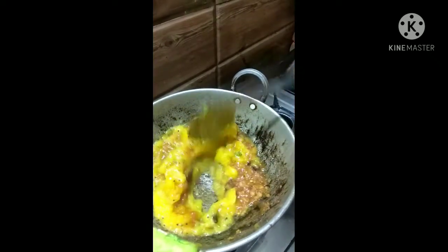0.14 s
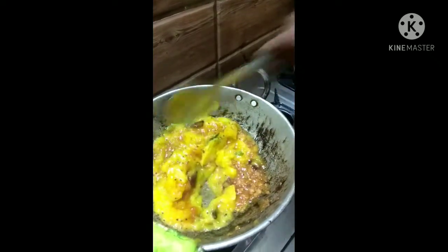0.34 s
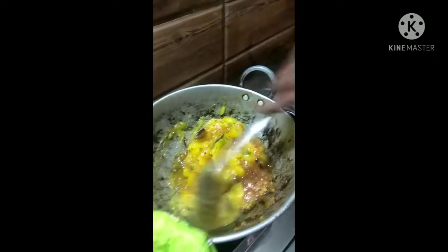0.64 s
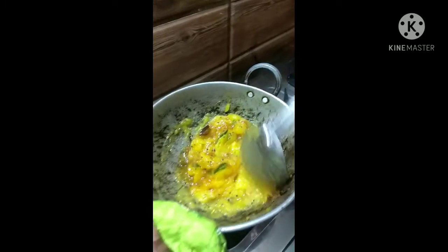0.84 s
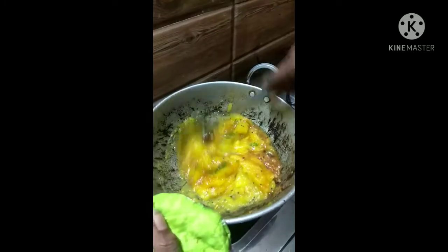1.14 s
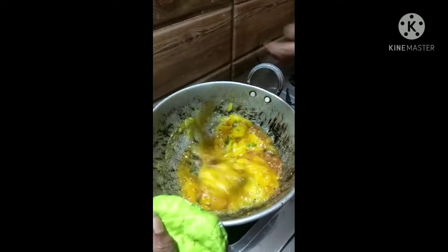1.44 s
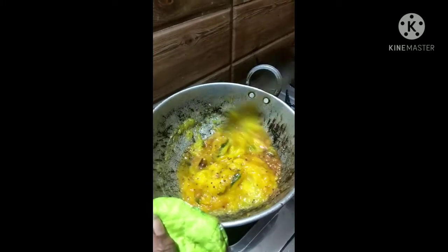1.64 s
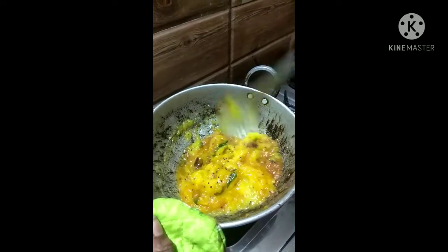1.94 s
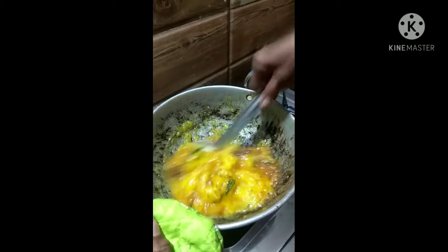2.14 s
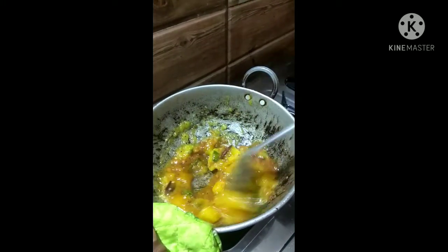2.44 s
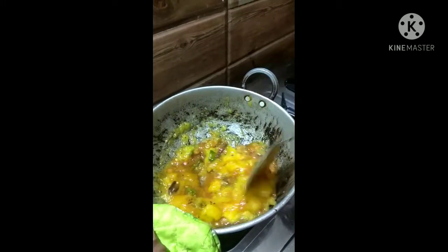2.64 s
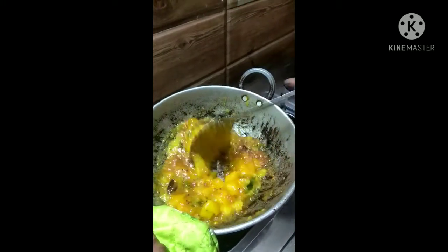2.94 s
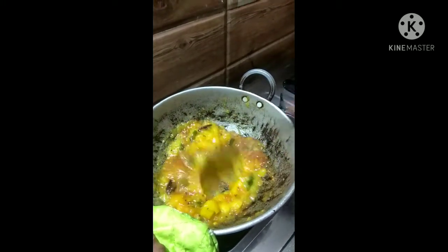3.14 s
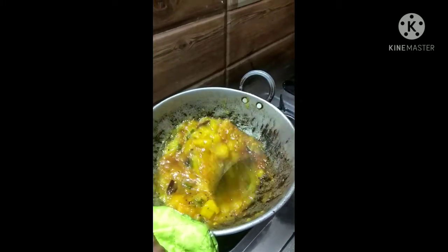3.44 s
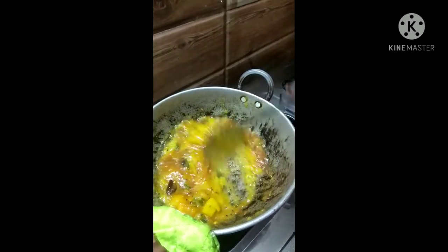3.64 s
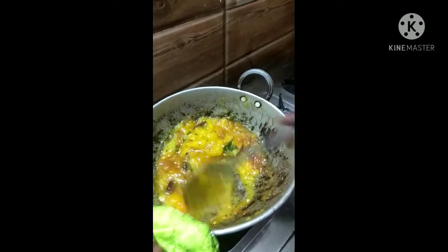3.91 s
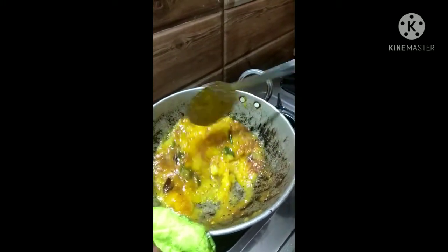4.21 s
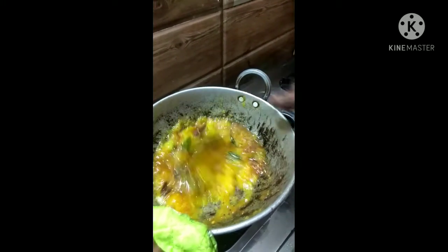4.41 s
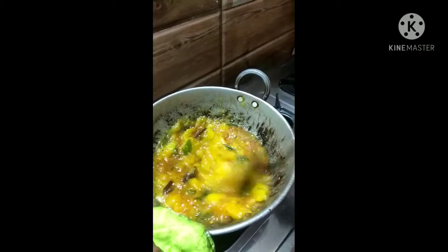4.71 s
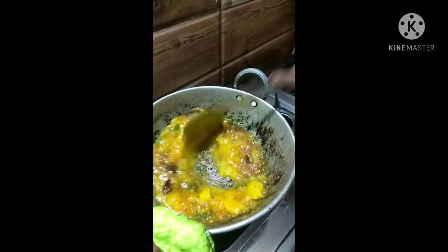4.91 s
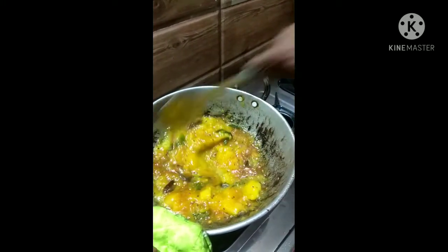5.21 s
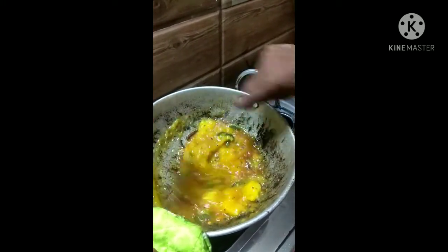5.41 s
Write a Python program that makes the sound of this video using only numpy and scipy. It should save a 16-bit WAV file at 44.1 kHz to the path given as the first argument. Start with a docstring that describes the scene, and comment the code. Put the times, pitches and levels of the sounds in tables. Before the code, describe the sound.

Thick food is stirred in a metal pan, with rasping scrapes, ringing knocks and a faint simmer over a gas flame.

```python
"""A slotted metal spatula scrapes and knocks against a deep metal pan of thick food on a gas stove.
Grit under the edge hisses and rasps, knocks make the pan ring dully, and both have a thin, high sheen.
Fat spits, lumps plop back, and the food simmers over the low drone of the flame. A small tiled kitchen
echoes the short sounds. Two microphone ports (openings) pick it all up, one bright and one dull."""
import sys
import numpy as np
from scipy import signal
from scipy.fft import rfft, irfft
from scipy.io import wavfile
from scipy.ndimage import uniform_filter1d

SR = 44100
rng = np.random.default_rng(int(sys.argv[2]) if len(sys.argv) > 2 else 0)


def write(x):
    x = np.atleast_2d(x).T
    wavfile.write(sys.argv[1], SR, np.round(np.clip(x, -1, 1) * 32767).astype(np.int16))


N = 245195
HZ = np.fft.rfftfreq(N, 1 / SR)
# tone of the spatula's edge on the pan: (frequency [Hz], level [dB])
EDGE_TONE = [(880, -34), (1500, -11.5), (1820, -5.5), (1970, -11.5), (2580, -8), (3150, -10.5),
             (3780, -10.5), (4390, -7), (5530, -7.5), (8770, -4.5), (10000, 3), (11200, 5.5), (12600, 0.5),
             (14000, -3.5), (15600, -5), (16500, -63)]


def scrapes():
    """The dragged edge hisses and rasps over grit and shakes the wall and the bottom of the pan."""
    gains, furrow_hz = drag_curves()
    edge = colour(patchy(grit(per_s=8000, spread_db=-5), 5.16, frames=36, bins=3), EDGE_TONE)
    slips = colour(grit(per_s=460, spread_db=3), EDGE_TONE)  # the edge sticks and lets go
    low_edge = signal.sosfiltfilt(signal.butter(3, 7000, fs=SR, output="sos"), edge)
    hiss = unit_level(edge - low_edge) + 0.28 * unit_level(slips)
    rasp = unit_level(low_edge) + 0.44 * unit_level(pan(edge, lo_hz=2000, hi_hz=7000))
    rasp += 0.45 * unit_level(high_ring(slips)) + 0.37 * unit_level(slips)
    # tone of the shaking wall: (frequency [Hz], level [dB])
    wall_tone = [(240, -106), (400, 8), (566, 1.5), (667, 6.5), (816, 2.5), (1190, 5), (2770, -3),
                 (4000, -2), (5200, -11), (8800, -120)]
    shake = colour(patchy(grit(per_s=1700, spread_db=0), 2.5, frames=40, bins=2), wall_tone)
    furrow = glide(glide(shake, furrow_hz, 180), furrow_hz, 320)  # the hollow behind the spatula
    wall = unit_level(shake) + 0.52 * unit_level(pan(shake, lo_hz=500, hi_hz=3000))
    wall += amp(-6) * unit_level(furrow)
    push = grit(per_s=600, spread_db=-15)
    bottom = unit_level(pan(push, lo_hz=100, hi_hz=500)) + 0.45 * unit_level(ring_twice(push, 290, 300))
    return sum(gain * unit_level(layer) for gain, layer in zip(gains, (hiss, rasp, wall, bottom)))


def drag_curves():
    """How strong hiss, rasp, wall and bottom are over time; the loudest drag leads the furrow's pitch."""
    # drags of the edge along the pan:
    # (start [s], rise [s], hold [s], hiss [dB], rasp [dB], wall [dB], bottom [dB], furrow pitch [Hz])
    drags = [(0, .001, 0.0047, -43, -48, -57, -63, 870),
             (0.013, 0.0047, 0.0089, -34, -39.5, -33.5, -35.5, 850),
             (0.055, 0.012, 0.059, -45, -47, -45.5, -42.5, 910),
             (0.104, 0.071, .005, -48.5, -50, -52, -63, 860),
             (0.182, 0.025, 0.16, -56, -55.5, -53.5, -48, 900),
             (0.395, 0.01, 0.027, -27.5, -32.5, -44, -48, 1420),
             (0.442, 0.031, 0.029, -46, -40, -36, -36, 830),
             (0.491, 0.084, 0.073, -26, -27.5, -30.5, -37.5, 1460),
             (0.665, 0.023, 0.069, -23.5, -28, -32, -33.5, 1150),
             (0.74, 0.033, .005, -21, -47, -34.5, -34.5, 1180),
             (1.154, 0.002, 0.071, -22.5, -27, -33, -33.5, 1230),
             (1.183, 0.087, 0.011, -37, -40, -25, -30.5, 524),
             (1.39, 0.044, 0.0099, -45, -45.5, -56, -40.5, 694),
             (1.478, 0.036, .04, -59, -52, -56, -46, 700),
             (1.555, 0.0089, 0.0053, -30, -33.5, -56, -43, 1130),
             (1.584, 0.0013, 0.0037, -13, -47, -20, -18.5, 1200),
             (1.625, 0.021, 0.0082, -11, -15.5, -26.5, -28.5, 1180),
             (1.687, 0.0056, 0.04, -21.5, -50, -34.5, -33, 1170),
             (1.972, 0.0025, 0.002, -13.5, -18.5, -26.5, -26, 1110),
             (1.998, 0.02, 0.0094, -29, -24.5, -32, -29, 1180),
             (2.024, 0.01, 0.017, -16, -21.5, -44, -48, 1200),
             (2.134, 0.033, 0.11, -38, -39, -38, -44, 1310), (2.2, 0.017, 0.017, -66, -39, -37, -79, 1670),
             (2.308, 0.048, 0.08, -62, -48.5, -56, -51.5, 665),
             (2.451, 0.089, 0.085, -38.5, -40.5, -52.5, -56.5, 620),
             (2.706, 0.052, 0.072, -49.5, -48.5, -60, -78, 1320),
             (2.835, 0.003, 0.099, -35, -32.5, -33.5, -30.5, 890),
             (2.968, 0.03, 0.16, -48.5, -54.5, -43, -69, 1500),
             (3.156, 0.041, 0.021, -45, -56, -47.5, -73, 1090),
             (3.231, 0.00097, 0.023, -35.5, -38.5, -28.5, -24, 880),
             (3.252, 0.013, 0.11, -40, -48, -62, -43.5, 740), (3.407, .02, 0.064, -57, -52, -71, -56, 1010),
             (3.591, 0.00084, 0.028, -25.5, -25.5, -19, -24.5, 1340),
             (3.674, 0.02, 0.049, -44.5, -58, -60, -39.5, 712),
             (3.788, 0.014, 0.077, -71, -59, -54.5, -53, 900),
             (3.982, 0.0018, 0.004, -44, -33, -36.5, -39, 1190),
             (3.989, 0.0011, 0.0057, -36, -38, -27, -27, 1150),
             (4.069, 0.0054, 0.0033, -35.5, -40, -44, -40, 746),
             (4.107, 0.057, 0.041, -41.5, -49.5, -45, -48.5, 910),
             (4.2, 0.028, 0.13, -82, -56.5, -42.5, -50, 915),
             (4.409, 0.0015, .01, -37.5, -45.5, -43.5, -67, 930),
             (4.424, 0.012, 0.14, -52, -50.5, -45, -43.5, 880),
             (4.565, 0.022, 0.032, -52, -47.5, -52, -46.5, 805),
             (4.669, 0.003, 0.0054, -30.5, -36.5, -53, -53, 1600),
             (4.721, 0.014, 0.059, -51, -47.5, -50.5, -36.5, 676),
             (4.823, 0.0015, 0.027, -40.5, -41, -59, -58, 740),
             (4.85, 0.013, 0.048, -46, -44, -53.5, -52.5, 1190),
             (4.949, 0.0029, 0.044, -44, -48, -67, -49.5, 860),
             (5.051, 0.0027, 0.067, -70, -55, -55, -42, 815),
             (5.27, 0.0018, 0.034, -40, -39.5, -45, -37, 1010),
             (5.289, 0.023, 0.028, -32.5, -30, -45, -57, 1060),
             (5.33, 0.027, 0.068, -35.5, -35.5, -35, -36.5, 1570),
             (5.402, 0.052, 0.05, -30.5, -28, -35.5, -29, 1270),
             (5.505, 0.014, 0.057, -37, -38, -29, -40, 1120)]
    columns = np.transpose(drags)
    timing, levels_db, pitch_hz = columns[:3], columns[3:7], columns[7]
    # how the four layers die away: (quick drop [dB/s], lingering part [dB], its fade [dB/s])
    fades = [(410, -8, 163), (226, -12.5, 87), (370, -9, 97), (171, -12.5, 140)]
    powers = [drag_power(timing, db, *fade) for db, fade in zip(levels_db, fades)]
    wall_power = powers[2]
    furrow_hz = (pitch_hz @ wall_power + pitch_hz[0] * 1e-20) / (wall_power.sum(axis=0) + 1e-20)
    gains = [ms_to_samples(np.sqrt(power.sum(axis=0))) for power in powers]
    return gains, ms_to_samples(furrow_hz)


def drag_power(timing, top_db, drop, linger_db, slow_fade, rise_from_db=-11.5):
    """Each drag's power, once a millisecond: it swells, holds, then drops and lingers as the edge lifts."""
    start, rise, hold = timing[:, :, None]
    since_start = np.arange(N * 1000 // SR + 2) / 1000 - start
    since_lift = np.maximum(since_start - rise - hold, 0)
    rising = amp(2 * rise_from_db * np.clip(1 - since_start / rise, 0, 1)) * (since_start >= 0)
    falling = amp(-2 * drop * since_lift) + amp(2 * (linger_db - slow_fade * since_lift))
    return amp(2 * top_db[:, None]) * rising * falling


def knocks():
    """The spatula hits the pan: a bright crack, a blow and clack with a rattle, and the pan ringing."""
    # spatula hits, with levels before the boosts below:
    # (time [s], blow [dB], clack [dB], crack [dB], blow pitch [Hz], rim [dB], clack pitch [Hz])
    hits = [(0.016, -26, -22.5, -41, 735, -27, 2210), (0.4, -38, -53, -16.5, 1000, -27, 1900),
            (0.413, -31.5, -45, -16, 1000, -14, 2580), (0.687, -45, -48, -13.5, 1230, -44, 1900),
            (0.725, -22, -45, -26, 1080, -35, 1900), (0.77, -27, -47, -21, 1110, -44, 1900),
            (1.156, -18.5, -17, -5, 1310, -35, 2250), (1.172, -45, -24, -16, 1200, -40, 2190),
            (1.244, -18.5, -39, -12, 506, -8.5, 1900), (1.568, -26.5, -19, -11, 1190, -45, 2640),
            (1.584, -14.5, -10.5, -3, 1250, -41, 5500), (1.643, -20.5, -18, -7, 790, 4, 3650),
            (1.65, -30, -8.5, -19, 1200, -0.5, 3700), (1.668, -19.5, -26, -5, 1150, -6, 3730),
            (1.975, -13.5, -29, -0.5, 1030, -8, 4540), (2.04, -30, -26, -7, 1300, -35, 5200),
            (2.745, -44, -37, -50, 1550, -55, 2290), (2.832, -16.5, -51, -47, 1240, -44, 1900),
            (2.84, -2.5, -6, -56, 910, -27, 2280), (3.227, -10, -13.5, -18, 1070, -20, 2780),
            (3.593, 0.5, -3, -9, 1130, -37, 1410), (3.985, -28, -26, -15, 1180, -37, 2180),
            (3.992, -11, -14, -38, 1090, -47, 2000), (4.673, -46, -41, -16.5, 1400, -47, 3470),
            (4.681, -28.5, -28, -12.5, 1400, -31, 2000), (5.271, -25.5, -25.5, -34, 1030, -41, 3220),
            (5.36, -39, -21, -21, 1070, -50, 2120)]
    thud_boost_db, clank_boost_db = 30.5, 16.5
    blows, cracks, rims, thuds, clanks = np.zeros((5, 2, N))
    t = np.arange(6000) / SR
    for start, blow_db, clack_db, crack_db, blow_hz, rim_db, clack_hz in hits:
        noise = rng.standard_normal((8, len(t)))
        first_wave = 4 * (t == 0) + 0.6 * noise[0] * decay(t, 0.004)  # reaches both ports alike
        rattle = 0.21 * noise[2:4] * decay(t, 0.11) * np.minimum(t / 0.00081, 1)
        force = first_wave + rattle
        blow = ring(ring(force, blow_hz, 0.5 * blow_hz), blow_hz, 0.77 * blow_hz)
        clack = ring(ring(force, clack_hz, 560), clack_hz, 600)
        add(blows, start + 0.000865, with_peak(blow, blow_db) + with_peak(clack, clack_db))
        add(thuds, start, amp(blow_db + thud_boost_db) * np.ones((2, 1)))
        tap = ring(np.ones((2, 1)) * (t == 0), blow_hz, blow_hz)
        add(clanks, start + 0.001036, amp(blow_db + clank_boost_db) * tap / tap.max())
        add(cracks, start, amp(crack_db) * noise[4:6] * (decay(t, 0.011) + 0.081 * decay(t, 0.13)))
        add(rims, start, amp(rim_db) * noise[6:] * decay(t, 0.053))
    bare_rim = pan(rims, lo_hz=3000, hi_hz=7000)  # above the food the metal rings freely
    boom = pan(thuds, lo_hz=100, hi_hz=500)
    clank = pan(clanks + amp(-42) * blows, lo_hz=100, hi_hz=3000)
    crack = colour(cracks, EDGE_TONE)
    return blows + boom + clank + crack + amp(10) * high_ring(crack) + amp(22.5) * bare_rim


def pan(x, lo_hz, hi_hz):
    """Shaken by x, the pan rings at those of its own notes that lie between two limits."""
    # the pan's notes: (pitch [Hz], level [dB], time to fade by 60 dB [s])
    notes = [(215, -12, .15), (299, -1, .2), (313, -7, .17), (453, -10, .2), (630, -12, .15),
             (726, -3, .15), (871, -9, .15), (1003, -12, .12), (1165, -11, .12), (1233, -4, .15),
             (1408, -9, .12), (1470, -10, .12), (1629, -9, .12), (1900, -14, .1), (2073, -18, .08),
             (2450, -16, .1), (3530, -11, .04), (3705, -9, .05), (3860, -12, .05), (4750, -15, .04),
             (5725, -12, .04)]
    return sum(amp(db) * fade_s * 10 * ring(x, hz, 1.44 / fade_s)
               for hz, db, fade_s in notes if lo_hz <= hz < hi_hz)


def high_ring(x):
    """Narrow high resonances that give the scrapes and cracks a thin, ringing sheen."""
    # the high resonances: (pitch [Hz], level [dB], ring length [s])
    resonances = [(2780, -13, 0.052), (3420, 3, 0.024), (4190, 5.5, 0.048), (4470, 0, 0.043),
                  (5370, 5.5, 0.014), (5880, 7, 0.048), (6250, 4, 0.025), (6630, -0.5, 0.018),
                  (7200, 0, 0.086), (7680, -26, 0.15), (8320, -29, 0.15), (9090, -19, 0.064)]
    return sum(amp(db) * ring(x, hz, 1.02 / ring_s) for hz, db, ring_s in resonances)


def ticks():
    """Spitting fat and light touches of the edge: tiny bursts that reach lower the duller they are."""
    # spits and touches: (time [s], peak level [dB], dullness [0-1])
    bursts = [(0.162, -23, 0), (0.214, -22, 0.01), (0.386, -24, 0), (0.43, -9, 0.15), (0.797, -9, 0.07),
              (0.906, -21, 0.03), (1.545, -27, 1), (1.849, -27, 0), (2.018, -8, 0), (2.4897, -17.5, 0),
              (3.059, -18, 0), (3.1582, -40, 0.6), (3.173, -38, 0.3), (3.3566, -24, 0), (3.658, -4.5, 0),
              (3.825, -25.5, 0.4), (4.075, -23, 0.6), (4.156, -42, 0.1), (4.177, -25, 0), (4.282, -34, 0.6),
              (4.4113, -23, 0.3), (4.4613, -17.5, 0.58), (4.482, -20, 0.04), (4.586, -24, 0.5),
              (4.83, -17, 0), (4.876, -27, 0), (4.902, -24, 0), (5.059, -30.5, 1), (5.1116, -33.5, 0.2)]
    out, t = np.zeros((2, N)), np.arange(1500) / SR
    for start, db, dullness in bursts:
        burst = rng.standard_normal((2, len(t))) * (decay(t, 0.0049) + 0.48 * decay(t, 0.053))
        lowest_hz = 9000 * amp(-25 * dullness)
        burst = signal.lfilter(*signal.butter(2, lowest_hz, "high", fs=SR), burst)
        add(out, start, amp(db) * burst / abs(burst).max(axis=1)[:, None])
    return out


def plops():
    """A soft lump lands: a quick hollow thud that wobbles as the food settles."""
    # falling lumps: (time [s], peak level [dB], pitch [Hz], settling time [s])
    lumps = [(1.433, -25, 734, 0.15), (2.808, -35, 1190, 0.079), (3.701, -23.5, 740, 0.19),
             (4.278, -33, 690, 0.12), (4.532, -24.5, 730, 0.12), (4.739, -25, 685, 0.13),
             (5.058, -42, 815, 0.13)]
    out, t = np.zeros((2, N)), np.arange(6000) / SR
    rise_s = 0.002
    for start, db, hz, settle_s in lumps:
        noise = rng.standard_normal((3, len(t)))
        slap = 8.4 * (abs(t - rise_s) < 0.5 / SR) + noise[0] * decay(t, 0.021)
        wobble = 0.55 * noise[1:] * amp(-60 * (t / settle_s) ** 1.45)
        force = (slap + wobble) * np.minimum(t / rise_s, 1)
        thud = ring(ring(ring(force, hz, 280), 0.91 * hz, 260), 1.03 * hz, 260)
        add(out, start - rise_s, with_peak(thud, db))
    return out + amp(-28) * pan(out, lo_hz=100, hi_hz=1500)


def clinks():
    """Tiny clinks: two high, slightly rough tones that start at once and die fast."""
    # clinks: (time [s], peak level [dB])
    events = [(1.9001, -34), (4.647, -26), (4.739, -45), (4.967, -24)]
    # the two tones: (pitch [Hz], level [dB])
    tones = [(10600, 0), (11900, 6)]
    out, t = np.zeros((2, N)), np.arange(3000) / SR
    for start, db in events:
        jolt = rng.standard_normal((2, len(t))) * decay(t, 0.05)
        clink = sum(amp(tone_db) * ring_twice(jolt, hz, 600) for hz, tone_db in tones)
        add(out, start, with_peak(clink, db))
    return out


def hum():
    """A faint, fuzzy hollow tone swells and fades in the pan as the food is folded over."""
    # the swell: (start [s], top [s], end [s], pitch [Hz], width [Hz], level [dB])
    swell = (2, 2.5, 3.5, 650, 107, -54)
    start, top, end, hz, width, db = swell
    tone = unit_level(ring_twice(rng.standard_normal((2, N)), hz, width))
    return amp(db) * tone * np.sqrt(np.interp(np.arange(N) / SR, [start, top, end], [0, 1, 0]))


def stove():
    """Steady simmer, the low drone of the flame and the faint rumble of the house."""
    # tone of flame and simmer: (frequency [Hz], level [dB])
    simmer_tone = [(15, -53), (25, -33), (97, -37), (138, -4), (197, -3.5), (378, -8), (470, -13.5),
                   (1680, -15), (1830, -13.5), (2460, -19), (4360, -24.5), (7110, -42), (11600, -17),
                   (15200, -30), (16500, -56)]
    flame_hz = 141
    simmer = colour(patchy(grit(per_s=5600, spread_db=2.5), 3.6, frames=60, bins=2), simmer_tone)
    drone = ring(ring(rng.standard_normal((2, N)), flame_hz, 8), flame_hz, 16)
    rumble = ring_twice(rng.standard_normal((2, N)), hz=60, width=62)
    return amp(-50) * unit_level(simmer) + amp(-56.5) * unit_level(drone) + amp(-83) * unit_level(rumble)


def kitchen(x):
    """The tiled room returns many small echoes; each pitch range dies at its own speed."""
    # length of the echo: (frequency [Hz], time to fade by 60 dB [s])
    fade_times = [(120, 0.77), (330, 0.55), (870, 0.48), (2300, 0.44), (6000, 0.44), (14000, 0.74)]
    echoes = np.zeros((2, SR // 2))
    grid = np.arange(200, SR // 2 - 20, 20)
    arrivals = grid + rng.integers(0, 20, (2, len(grid)))
    np.put_along_axis(echoes, arrivals, rng.choice([-1., 1.], arrivals.shape), 1)
    hz, t, bands = signal.stft(echoes, SR, nperseg=256)
    tail = signal.istft(bands * decay(t, look_up(fade_times, hz)[:, None]), SR, nperseg=256)[1]
    return signal.fftconvolve(x, tail / np.linalg.norm(tail[0]), axes=1)[:, :N]


def grit(per_s, spread_db):
    """Dense clicks of uneven size; each port hears its own mixture."""
    size = amp(spread_db * np.minimum(rng.exponential(1, N), 5)) * (rng.random(N) < per_s / SR)
    return np.sqrt(abs(uniform_filter1d(size, size=24))) * rng.standard_normal((2, N))


def patchy(x, patch_db, frames, bins):
    """Make x louder and softer in random patches, `frames` long in time and `bins` wide in pitch."""
    bands = signal.stft(x, nperseg=256, noverlap=192)[2]
    patches = uniform_filter1d(rng.standard_normal(bands.shape[1:]), size=bins, axis=0)
    patches = unit_level(uniform_filter1d(patches, size=frames, axis=1))
    return signal.istft(bands * amp(patch_db * patches), nperseg=256, noverlap=192)[1][:, :N]


def ring(x, hz, width):
    """A resonance: keeps the part of x near hz, in a band `width` Hz wide."""
    return signal.lfilter(*signal.iirpeak(hz, hz / width, SR), x)


def ring_twice(x, hz, width):
    return ring(ring(x, hz, width), hz, width)


def glide(x, hz, width):
    """A resonance that follows the curve hz: shift down to zero, smooth, shift back."""
    turn = np.exp(2j * np.pi * np.cumsum(hz) / SR)
    memory = np.exp(-np.pi * width / SR)
    return 2 * (turn * signal.lfilter([1 - memory], [1, -memory], x / turn)).real


def colour(x, tone):
    """Turn each frequency of x up or down as the tone table says."""
    return irfft(rfft(x) * amp(look_up(tone, HZ)), N)


def look_up(table, hz):
    """The value at hz, sliding between the rows of a table."""
    row_hz, values = np.transpose(table)
    return np.interp(np.log(hz + 1), np.log(row_hz + 1), values)


def amp(db):
    return 10 ** (np.asarray(db) / 20)


def decay(t, fade_s):
    """Falls by 60 dB every fade_s seconds."""
    return amp(-60 * t / fade_s)


def unit_level(x):
    return x / np.sqrt(np.mean(x ** 2) + 1e-20)


def with_peak(x, db):
    return amp(db) * x / abs(x).max()


def ms_to_samples(curve):
    return np.interp(np.arange(N) * 1000 / SR, np.arange(len(curve)), curve)


def add(mix, start_s, sound):
    part = mix[:, round(start_s * SR):][:, :sound.shape[1]]
    part += sound[:, :part.shape[1]]


def scene():
    """Stirring over the stove's steady sound; only the short sounds get the room's echo."""
    hits = knocks() + ticks() + clinks() + plops()
    stirring = hits + amp(-9) * kitchen(hits) + scrapes() + hum()
    bass_cut = signal.butter(2, 125, "high", fs=SR, output="sos")  # a small pan gives no deep bass
    left, other = rfft(signal.sosfilt(bass_cut, stirring) + stove())
    # long waves reach both ports alike: (frequency [Hz], left-right likeness [0-1])
    likeness = [(60, 0.43), (150, 1), (380, 0.78), (950, 0.12), (2380, 0), (5980, -0.0), (15000, 0.0066)]
    same = look_up(likeness, HZ)
    right = same * left + np.sqrt(1 - same ** 2) * other
    return irfft(np.array([left, right]), N)


def record(dry):
    """The left port favours the treble; both share an uneven bass and lose the very top."""
    # balance of the ports: (frequency [Hz], left above right [dB])
    balance = [(60, -1), (99, -8), (160, 5), (270, -3), (450, 0.5), (740, -2), (1220, 3.5), (2010, 4.5),
               (3330, 2.5), (5500, -2), (9080, 5), (15000, 30)]
    # tone of the microphone: (frequency [Hz], level [dB])
    mic_tone = [(25, 1), (45, 9.5), (75, -5), (100, 1.5), (125, -5), (15200, -4.5), (15600, -7),
                (15900, -27), (17000, -53)]
    lean = amp(look_up(balance, HZ))
    ports = np.array([lean, np.ones(len(HZ))]) * np.sqrt(2 / (1 + lean ** 2))
    heard = irfft(rfft(dry) * ports * amp(look_up(mic_tone, HZ)), N) * amp(0.5)
    heard = 0.95 * np.tanh(heard / 0.95)  # the loudest cracks overload the input softly
    top_cut = signal.firwin(511, cutoff=16800, window=("kaiser", 13), fs=SR)
    return signal.oaconvolve(heard, top_cut[None], "same")


dry = scene()
out = record(dry)
write(out)
```